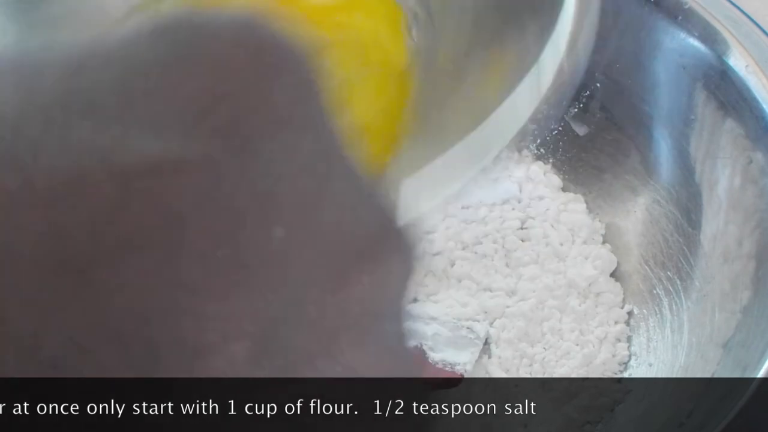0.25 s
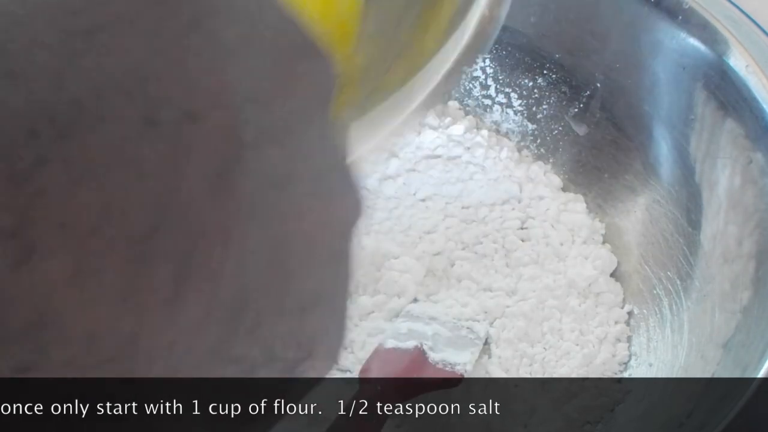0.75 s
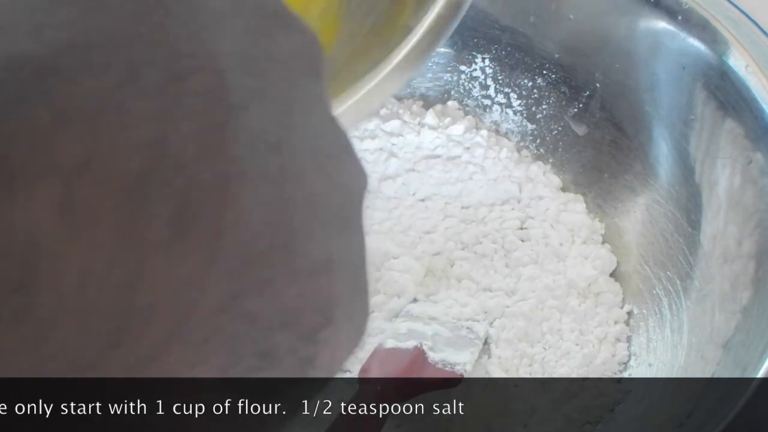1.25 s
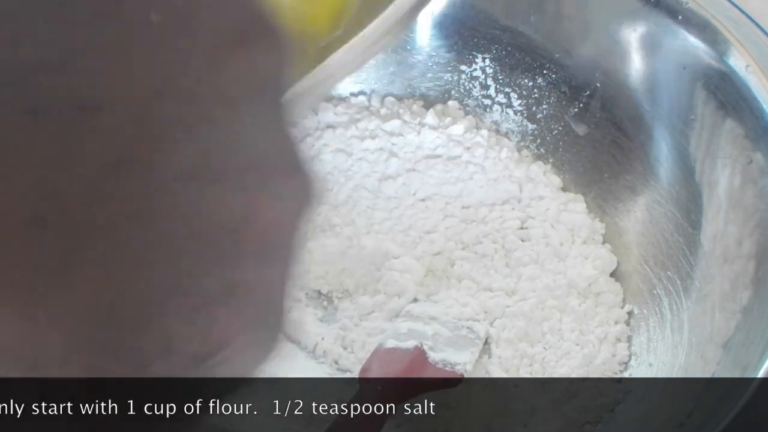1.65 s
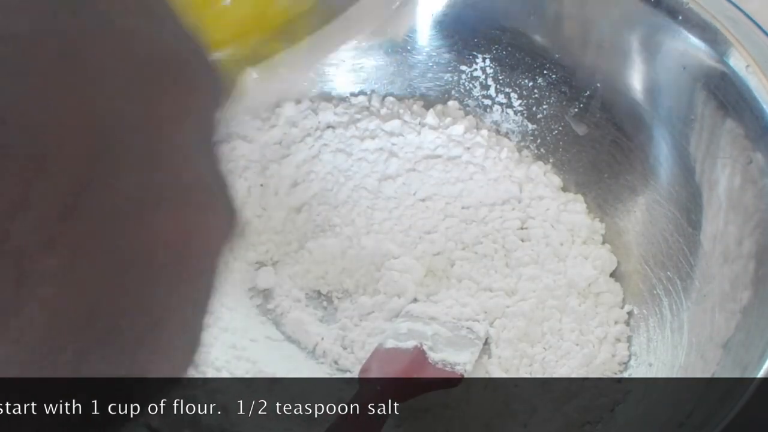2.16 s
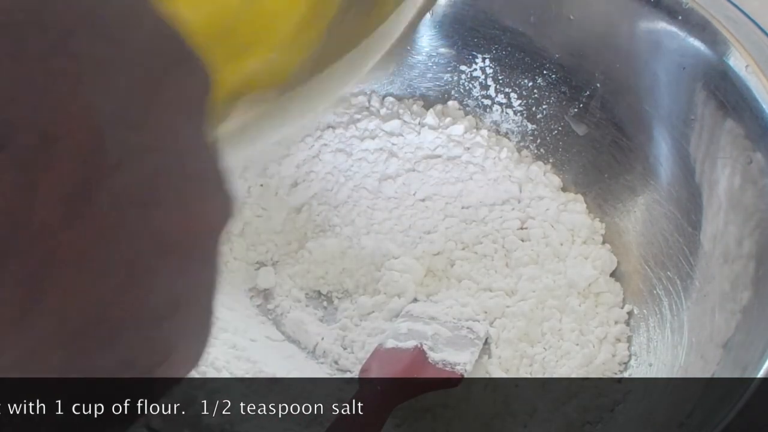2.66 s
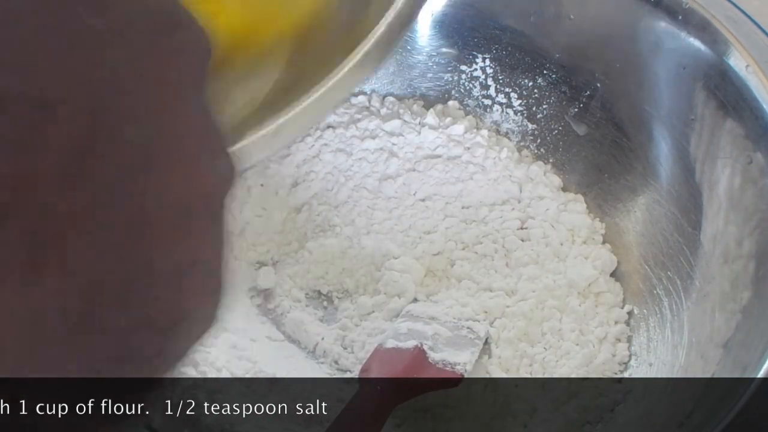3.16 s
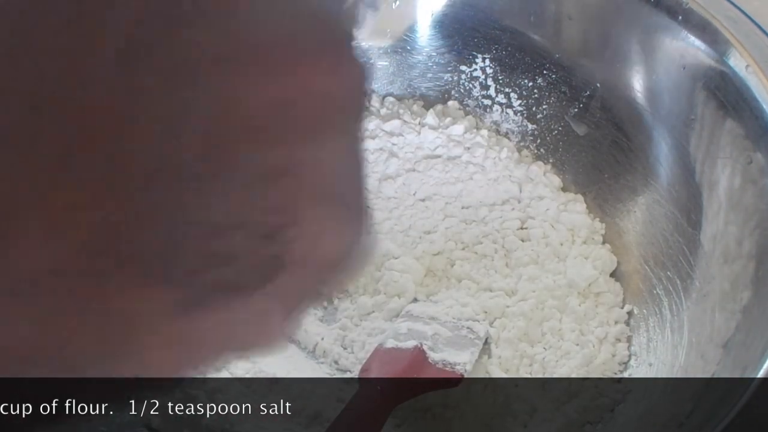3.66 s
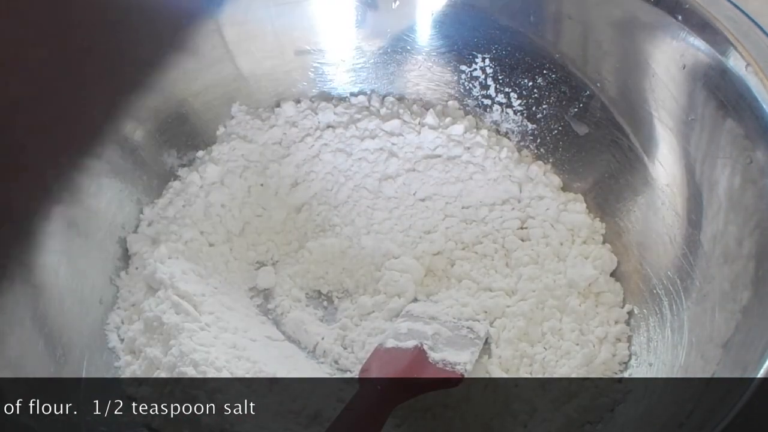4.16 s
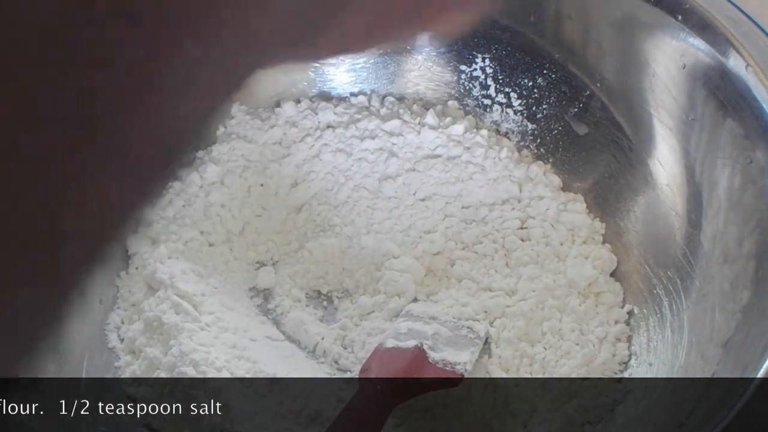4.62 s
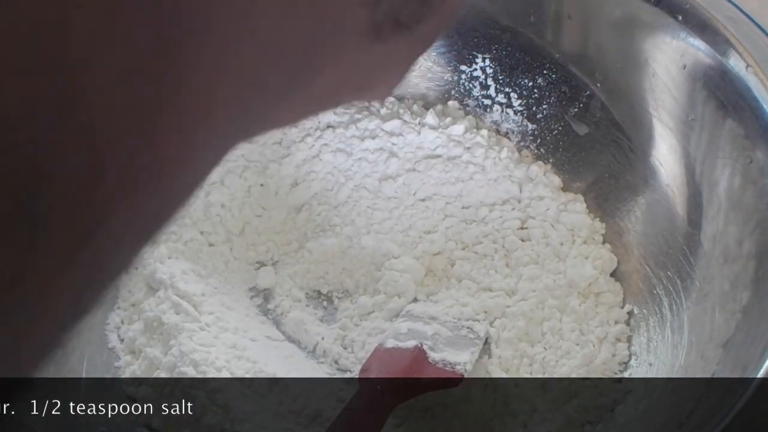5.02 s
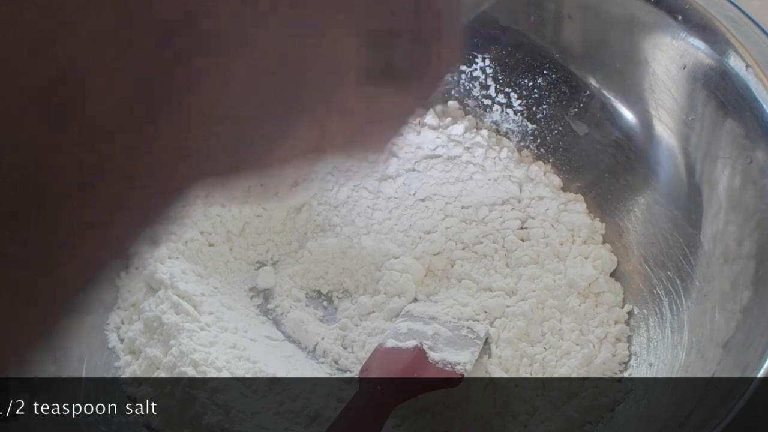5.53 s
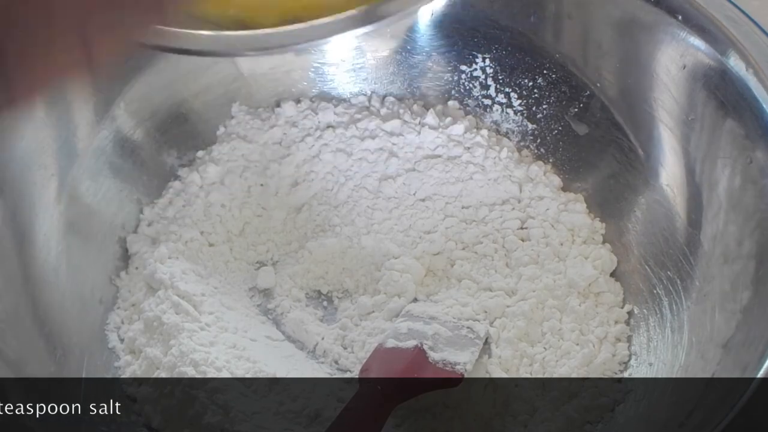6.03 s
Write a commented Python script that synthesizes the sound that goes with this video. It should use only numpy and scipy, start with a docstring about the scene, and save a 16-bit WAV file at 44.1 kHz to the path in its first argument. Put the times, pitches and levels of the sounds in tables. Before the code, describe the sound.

A fork beats eggs in a small steel bowl without pause, nearly six strokes a second. Every stroke swells as a gritty wet scrape, hits with a bright rattling click, then lifts off. Short hollow knocks and liquid plops come irregularly, the bowl's ring damped by the egg. Close small microphone, thin in bass, in a quiet kitchen with faint air noise.

```python
"""A fork beats eggs in a small steel bowl, close to a small camera in a quiet kitchen, almost six strokes a
second. Each stroke lands, swells as a hiss of gritty clicks, strikes the bottom with a bright rattle and a
knock, and lifts off. The clicks drive decaying bowl modes, damped by the egg; short gliding tones are the
knocks of the fork on the bowl. Echo tails of shaped noise, faint air noise and appliance tones make the
kitchen. The camera's housing thins the bass and cuts narrow gaps into the treble."""
import sys
import numpy as np
from scipy import signal
from scipy.fft import rfft, irfft, next_fast_len
from scipy.io import wavfile
from scipy.ndimage import uniform_filter1d

SR = 44100
rng = np.random.default_rng(int(sys.argv[2]) if len(sys.argv) > 2 else 0)


def generate_wav(sig):
    """Save sig (samples, or channels by samples) to the path in sys.argv[1] as 16-bit PCM at SR."""
    pcm = np.round(np.clip(np.atleast_2d(sig).T, -1, 1) * 32767).astype(np.int16)
    wavfile.write(sys.argv[1], SR, pcm)


N = 277256

# Fork strokes: land_s, strike_s, scrape_peak_db, strike_peak_db, lower_ring_db, deep_ring_db
# (both rings are in dB over the scrape)
STROKES = [(-.03, 0.028, -32, -11.5, 1.5, -22), (0.142, 0.21, -31, -40, -9.5, -17.5),
           (0.311, 0.375, -30.5, -14, -13.5, -3), (.478, 0.5374, -28.5, -17, -6.5, -23),
           (0.657, 0.7133, -30.5, -18.5, -11, -7), (.825, 0.881, -30.5, -22.5, -3, -2),
           (0.999, 1.048, -31.5, -30, -5.5, -2.5), (1.176, 1.216, -29.5, -39, -5.5, -7),
           (1.343, 1.388, -29, -35, -5, -4), (1.513, 1.5638, -29, -14, -9.5, -8.5),
           (1.687, 1.7327, -30.5, -18, -9.5, -9), (1.863, 1.911, -29.5, -11, -.5, -9.5),
           (2.031, 2.098, -30.5, -21, -1.5, 1), (2.207, 2.2622, -31.5, -13, .5, -28),
           (2.389, 2.437, -31, -18, -4.5, -38), (2.562, 2.6076, -28.5, -13, -0.5, -12),
           (2.741, 2.7765, -30.5, -14.5, 8.5, -9), (2.913, 2.9595, -30.5, -19.5, 2.5, -2),
           (3.099, 3.147, -30.5, -12, -3.5, -1), (3.281, 3.3317, -33, -13, -6, 7),
           (3.464, 3.521, -32, -17, 3, -16), (3.651, 3.695, -31, -34, 2, -1.5),
           (3.837, 3.878, -34, -25, 4.5, -7.5), (4.021, 4.0644, -31, -25, 5, -7),
           (4.207, 4.2622, -33.5, -20, 0, -37), (4.389, 4.4448, -35, -19.5, 5.5, -5),
           (4.568, 4.621, -33.5, -16, -13, -20), (4.752, 4.802, -33, -17, -1.5, -31),
           (4.929, 4.9814, -31, -15, 3, -2), (5.112, 5.162, -32, -17.5, -3, -43),
           (5.29, 5.3343, -28, -16.5, -1, -21), (5.455, 5.505, -30.5, -34, -3.5, -27),
           (5.623, 5.6733, -36.5, -14, 3.5, -27)]
# Colour of tines scraping wet steel: frequency_hz, relative_level_db (per Hz)
SCRAPE_COLOUR = [(500, -28.5), (1500, 11), (2200, -15.5), (3400, -32), (4100, -3), (4700, 8), (5900, 4.5),
                 (7000, 9), (7700, 0.5), (8600, -12), (10600, -16.5), (11300, -58.5)]


def undb(db):
    """Decibels to amplitude gain."""
    return 10 ** (np.asarray(db) / 20)


def unit(x):
    """Scale to an RMS of 1."""
    return x / np.sqrt(np.mean(x ** 2))


def colour(x, points):
    """Shape a signal to a spectrum of (Hz, dB) points, joined along log frequency."""
    hz, db = np.transpose(points)
    size = next_fast_len(x.shape[-1])
    log_hz = np.log(np.fft.rfftfreq(size, 1 / SR) + 1)
    gain = undb(np.interp(log_hz, np.log(hz), db, left=-80))
    return irfft(rfft(x, size) * gain, size)[..., :x.shape[-1]]


def ring(x, hz, t60):
    """One resonant mode driven by x, falling 60 dB in t60 seconds."""
    pole = np.exp((2j * np.pi * hz - np.log(1000) / t60) / SR)
    return signal.lfilter([1], [1, -pole], x).imag


def grit(rate, spread_db):
    """Random stick-slip clicks, rate per second, some larger than the rest."""
    hit = rng.random(N) < rate / SR
    size = np.minimum(rng.exponential(size=N), 3)
    return unit(hit * rng.standard_normal(N) * undb(spread_db * size))


def walk(rate):
    """Random levels that glide to a new value every 1 / rate s, with an RMS of 1."""
    hold = int(SR / rate)
    steps = np.repeat(rng.standard_normal(N // hold + 1), hold)
    return unit(uniform_filter1d(steps, hold)[:N])


def stereo(mid, side, share):
    """Left and right from mid and a share of side."""
    return np.array([mid + share * side, mid - share * side])


def pressure(bend=1.75):
    """Scrape amplitude and running stroke number: it swells to the strike, then fades as the fork lifts."""
    contact_s = 0.11  # from landing until the scrape is 20 dB below its peak
    peak_lag_s, landing_s = .004, .006  # scrape peak after the strike; tines settling on the steel
    # growth from landing to peak: slow strokes grow less
    swell_db, swell_db_per_s, usual_swell_s = 12, -300, 0.052
    t, level = np.arange(N) / SR, np.zeros(N)
    for land, strike, peak_db, *_ in STROKES:
        swell = strike + peak_lag_s - land
        growth_db = swell_db + swell_db_per_s * (swell - usual_swell_s)
        rise = -growth_db * np.clip(1 - (t - land) / swell, 0, 1)
        fall = -20 * (np.clip(t - land - swell, 0, 1) / (contact_s - swell)) ** bend
        level += np.clip((t - land) / landing_s, 0, 1) * undb(peak_db + rise + fall)
    stroke = np.clip(np.searchsorted(np.array(STROKES)[:, 0], t) - 1, 0, None)
    return level, stroke


def scrape(level, patchy_db=5.0, drift_db=2.5, wide=0.52):
    """Hiss of tines on wet steel: stick-slip clicks whose bands come and go with the egg film."""
    hiss = np.array([unit(colour(grit(14000, 1.5), SCRAPE_COLOUR)) for _ in range(2)])
    edges = 500 * 1.17 ** np.arange(21)  # Hz
    patchy = 0
    for band in zip(edges[:-1], edges[1:]):
        part = signal.sosfilt(signal.butter(1, band, "band", fs=SR, output="sos"), hiss)
        patchy = patchy + part * undb(patchy_db * walk(61) + drift_db * walk(12))
    mid, side = unit(patchy) * level
    return stereo(mid, side, wide)


def tilt_db(s):
    """Ring of the rim and of the upper modes at time s, as the bowl is tilted."""
    # Ring along the tilting: time_s, rim_db, upper_db (both over the scrape)
    tilt = [(0.0, -19, 0.5), (.7, -18, -5.5), (1.3, -9, -2), (2.0, -16, -1), (2.5, -17, 1),
            (3.3, -17.5, 0.5), (4.1, -13, 2.5), (4.6, -19, 5.5), (5.0, -20, 2.5), (5.7, -11, 2)]
    at, rim, upper = np.transpose(tilt)
    return np.interp(s, at, rim), np.interp(s, at, upper)


def bowl(level, stroke, spot_db=4.0, slosh_db=4.0):
    """The clicks ring the bowl; every stroke favours other modes, and the sloshing egg frees and damps them."""
    # Resonances of the steel: frequency_hz, level_db (relative within a family)
    bowl_modes = [(455, -9.5), (540, -5.5), (620, -5), (704, 7.5), (775, 13), (835, -8), (900, -27.5),
                  (958, 6.5), (1020, 4.5), (1130, 8), (1250, -12.5), (1385, -25.5), (1525, -7.5),
                  (1590, -13.5), (1690, 0), (1770, -3), (1870, -13.5), (2050, -17), (2690, 12.5),
                  (2800, 6.5), (3320, 6), (3590, 1), (3900, 6.5)]
    # Mode families rim, upper, lower, deep: from_hz, to_hz
    family_hz = [(2300, 4200), (1300, 2300), (870, 1300), (400, 870)]
    ring_s = .06  # t60 of a mode at 1 kHz
    out = 0
    lands, _, _, _, lower_db, deep_db = np.transpose(STROKES)
    family_db = [*tilt_db(lands), lower_db, deep_db]
    for db, (low, high) in zip(family_db, family_hz):
        modes = [mode for mode in bowl_modes if low < mode[0] < high]
        drive = grit(3000, 1.7) * level * undb(db[stroke])
        stroke_change_db = spot_db * rng.standard_normal((len(STROKES), len(modes)))
        spot = undb(np.array(modes)[:, 1] + stroke_change_db)
        spot /= np.sqrt(np.sum(spot ** 2, axis=1, keepdims=True))
        for k, (hz, _) in enumerate(modes):
            t60 = ring_s * (1000 / hz) ** .75  # the egg damps higher modes faster
            steady_gain = np.sqrt(t60 * SR / np.log(1000)) / 2
            mode_drive = drive * spot[stroke, k] * undb(slosh_db * walk(40))
            out = out + ring(mode_drive, hz, t60) / steady_gain
    return out


def room(x, t60=0.24, treble_db=-8):
    """Diffuse echoes of the kitchen: decaying shaped noise, unlike left and right."""
    t = np.arange(int(.4 * SR)) / SR
    noise = rng.standard_normal((2, len(t)))
    tails = colour(noise, [(100, 0.011), (1500, 0.074), (8000, treble_db)]) * undb(-60 * t / t60)
    tails = tails / np.sqrt(np.sum(tails ** 2, axis=1, keepdims=True))
    return signal.fftconvolve(x[None], tails, axes=1)[:, :N]


def kitchen():
    """Faint shaped air noise that drifts in level, and appliance tones of noise-driven resonances that waver."""
    # Air noise colour: frequency_hz, relative_level_db (per Hz)
    air_colour = [(180, -6), (330, -11), (520, 1), (860, 2), (1400, -8), (1900, -13), (2300, -26.5),
                  (3400, -32), (5000, -24), (7000, -33.5), (8000, -66)]
    # Faint appliance tones: pitch_hz, level_db
    appliance_tones = [(359, -57), (458, -55.5), (539, -62), (705, -65.5), (834, -67)]
    air_db = -56.5
    mid, side = (unit(colour(rng.standard_normal(N), air_colour)) for _ in range(2))
    air = stereo(mid, side, .15) * undb(air_db + 1.9 * walk(22))
    hum = sum(undb(db) * unit(ring(rng.standard_normal(N), hz, .25)) for hz, db in appliance_tones)
    return air + hum


def ticks(rattle_s=0.0051, wide=0.51, dull_db=-9):
    """Each strike is a decaying rattle of a few ms with the colour of the scrape, a little duller on top."""
    out = np.zeros((2, N))
    noise = colour(rng.standard_normal((2, N)), SCRAPE_COLOUR)
    noise = colour(noise, [(100, 0), (7000, 0.0029), (10000, dull_db)])
    tail = np.exp(-np.arange(900) / (rattle_s * SR))
    for _, strike, _, db, *_ in STROKES:
        start = int(strike * SR)
        at = slice(start, start + len(tail))
        burst = noise[:, at] * tail
        out[:, at] += undb(db) * burst / np.abs(burst[0]).max()
    return stereo(*out, wide)


def knocks(attack=0.14, glide=0.037, hold=0.53, rough=0.6):
    """Each knock is a short wobbly tone that rises a little in pitch as it dies away."""
    # Other short hollow knocks of the fork ringing the bowl: start_s, peak_db, pitch_hz, length_ms
    knock_events = [(0.031, -10, 1400, 3.1), (0.505, -16.5, 1520, 4.6), (.869, -15.5, 817, 5.7),
                    (1.042, -19, 900, 10.3), (1.071, -20.5, 1745, 7.2), (1.167, -25, 1083, 28),
                    (1.4, -17.5, 1830, 5.1), (1.563, -21, 1080, 14), (1.738, -22.5, 1530, 19),
                    (1.914, -14, 1719, 17), (2.038, -9.5, 1330, 2.7), (2.037, -12, 964, 3.7),
                    (2.062, -15.5, 949, 20), (2.096, -14, 1815, 4.6), (2.106, -20.5, 1580, 21),
                    (2.264, -15, 1773, 11), (2.275, -16, 967, 18), (2.599, -23, 930, 12.8),
                    (2.759, -22.5, 846, 12), (2.76, -19.5, 1510, 15), (2.782, -6.5, 1668, 6.7),
                    (2.801, -5, 790, 16.3), (2.879, -24.5, 1367, 12), (2.982, -17.5, 697, 15),
                    (3.147, -16.5, 774, 15), (3.317, -13, 958, 20), (3.331, -9.5, 1573, 3.9),
                    (3.488, -21.5, 1760, 32), (3.526, -11, 797, 36), (3.709, -14, 977, 4.4),
                    (3.891, -16.5, 991, 9.3), (4.048, -13, 970, 7.6), (4.253, -23.5, 1138, 14),
                    (4.262, -14, 1515, 8.2), (4.54, -16, 1757, 11), (4.931, -11.5, 1690, 4.3),
                    (4.932, -12, 1060, 2.8), (4.961, -13.5, 761, 16.7), (5.329, -11.5, 1075, 10.8),
                    (5.337, -13, 1760, 18.4), (5.353, -19.5, 1150, 17), (5.381, -17, 975, 24),
                    (5.699, -16.5, 1690, 4.7), (5.7, -15, 973, 22)]
    # Knock of every strike: level_db (over the strike peak plus upper ring), pitch_hz, length_ms
    strike_knock = (-1.5, 1730, 4.2)
    over_db, strike_hz, strike_ms = strike_knock
    out, t = np.zeros(N), np.arange(2600) / SR
    wobble = walk(250) + 1j * walk(250)  # unsteadiness of both level and phase
    rows = [(strike, db + over_db + tilt_db(strike)[1], strike_hz, strike_ms)
            for _, strike, _, db, *_ in STROKES]
    rows = rows + knock_events
    for (s, db, hz, ms), phase in zip(rows, rng.random(len(rows))):
        start = int(s * SR)
        at = slice(start, start + len(t))
        age = 1000 * t / ms  # in knock lengths, as are attack and hold
        shape = (1 - np.exp(-(age / attack) ** 2)) * np.exp(-(age / hold) ** 0.8)
        cycles = hz * t * (1 + glide * (age - 1) / 2) + phase
        tone = np.exp(2j * np.pi * cycles) * (1 + rough * wobble[at])
        knock = shape * tone.imag
        out[at] += undb(db) * knock / np.abs(knock).max()
    return out


def scene():
    """Fork and bowl up close, with their echoes and the quiet kitchen behind."""
    level, stroke = pressure()
    near = scrape(level) + bowl(level, stroke) + ticks() + knocks()
    return near + undb(-21) * room(near.mean(axis=0)) + kitchen()


def record(dry):
    """Small microphones: little bass, narrow gaps from the housing, a steep top."""
    # Housing notches: centre_hz, width_hz, depth_db
    gaps = [(2424, 930, -36), (2981, 570, -29), (8010, 1400, -26)]
    bass_cut_hz, top_hz = 802, 11250
    left_db = -1.5  # left relative to right
    x = signal.sosfilt(signal.butter(3, bass_cut_hz, "high", fs=SR, output="sos"), dry)
    for hz, width, db in gaps:
        x = x - (1 - undb(db)) * signal.lfilter(*signal.iirpeak(hz, hz / width, fs=SR), x)
    x = x * undb([[left_db / 2], [-left_db / 2]])
    return signal.sosfilt(signal.ellip(10, .2, 60, top_hz, fs=SR, output="sos"), x)


dry = scene()
out = record(dry)
generate_wav(out)
```